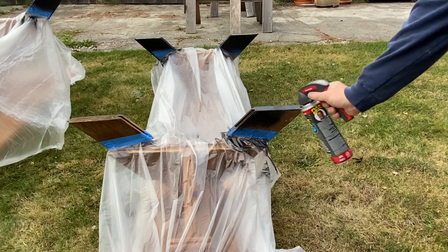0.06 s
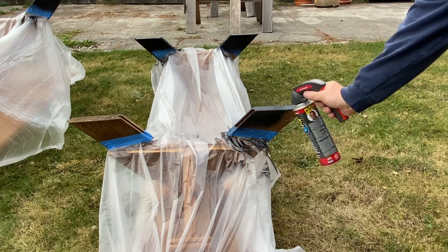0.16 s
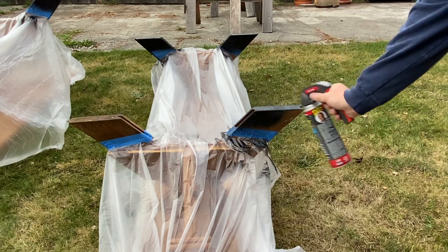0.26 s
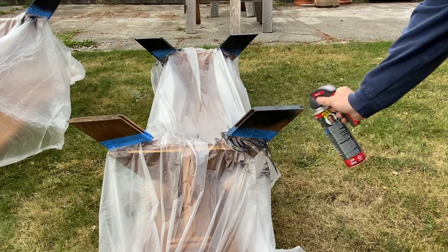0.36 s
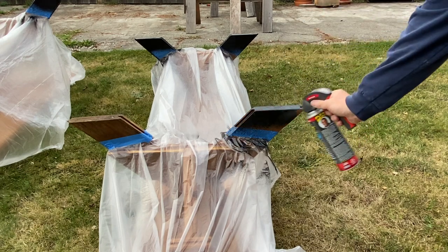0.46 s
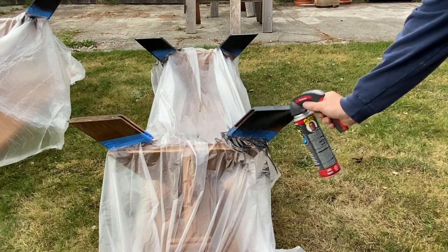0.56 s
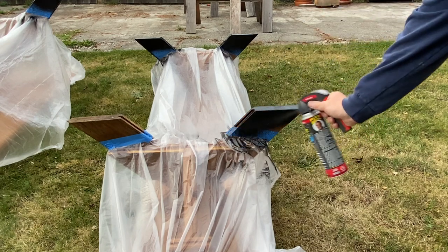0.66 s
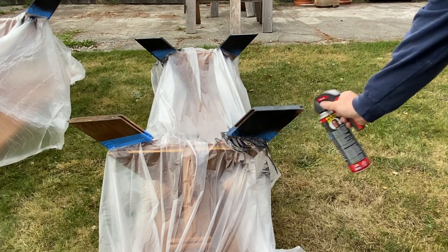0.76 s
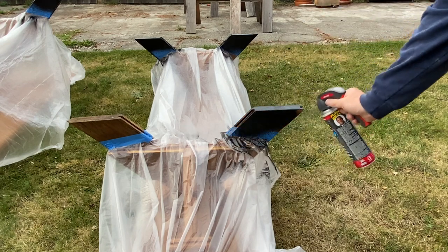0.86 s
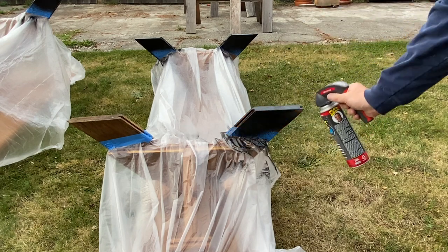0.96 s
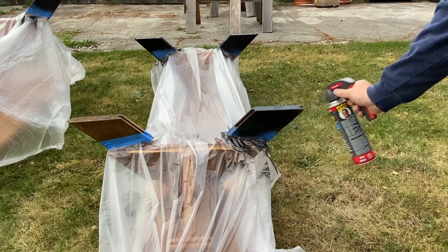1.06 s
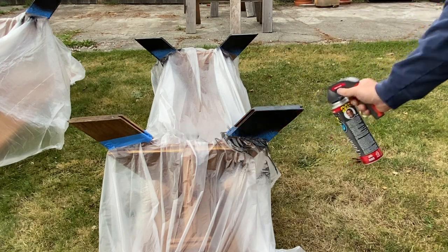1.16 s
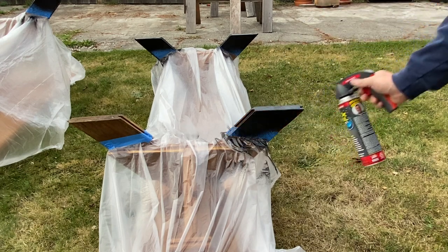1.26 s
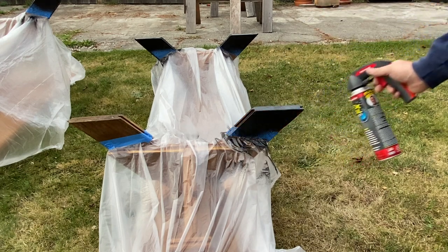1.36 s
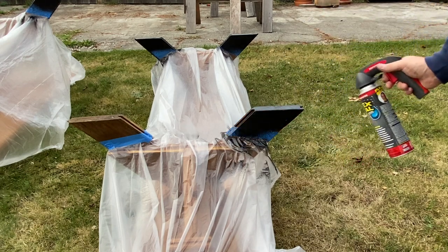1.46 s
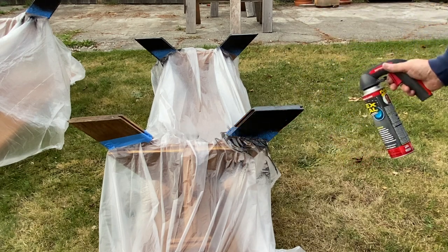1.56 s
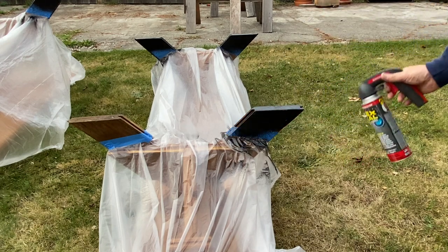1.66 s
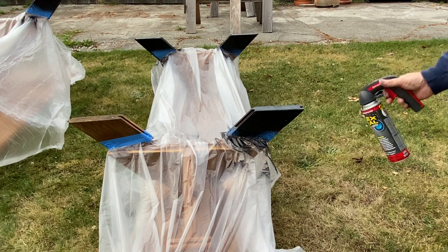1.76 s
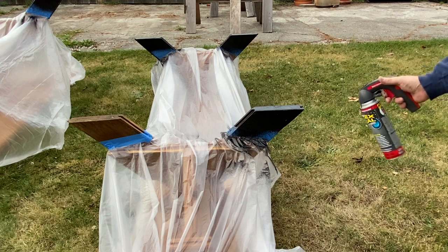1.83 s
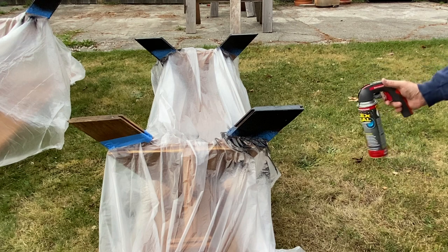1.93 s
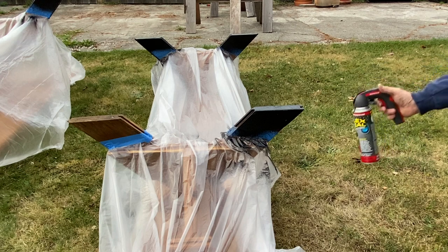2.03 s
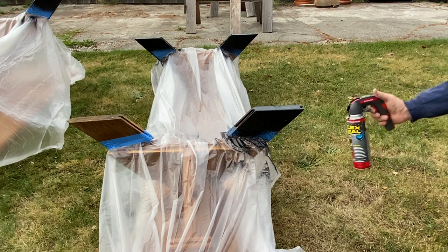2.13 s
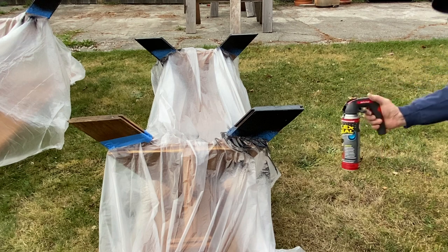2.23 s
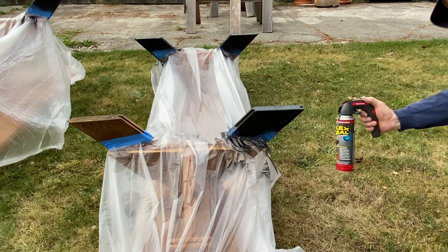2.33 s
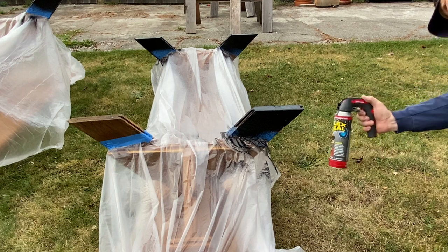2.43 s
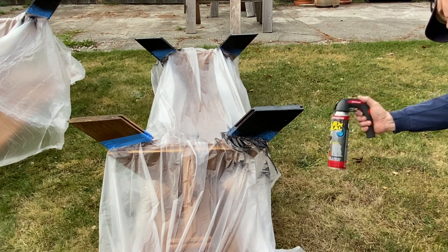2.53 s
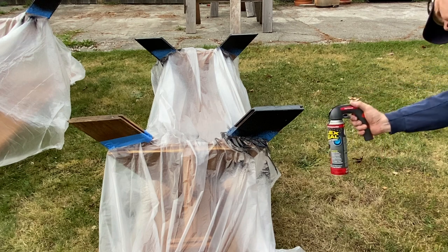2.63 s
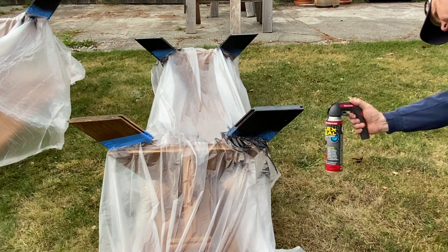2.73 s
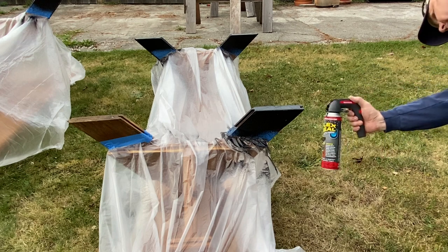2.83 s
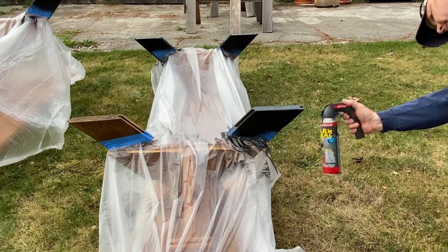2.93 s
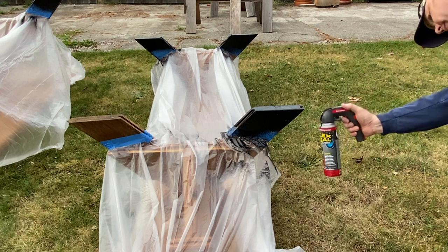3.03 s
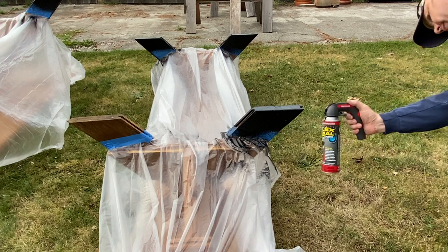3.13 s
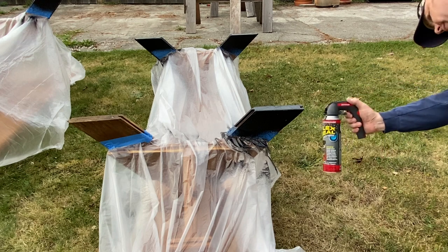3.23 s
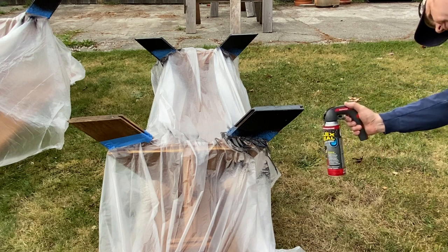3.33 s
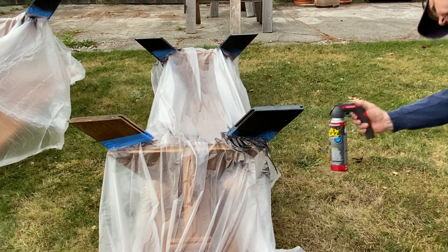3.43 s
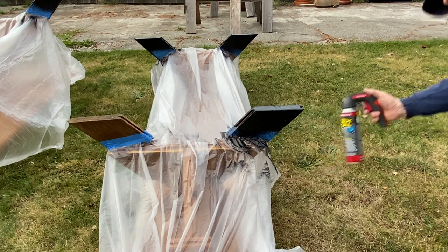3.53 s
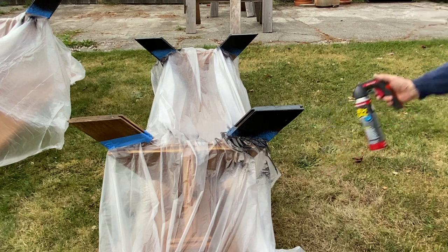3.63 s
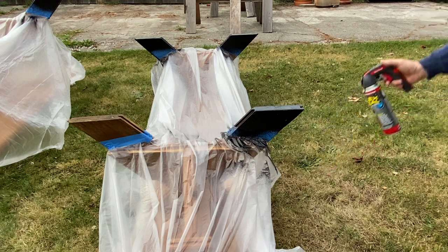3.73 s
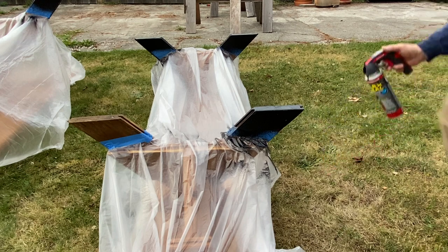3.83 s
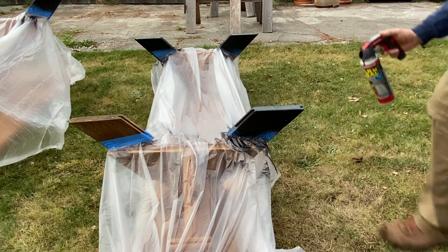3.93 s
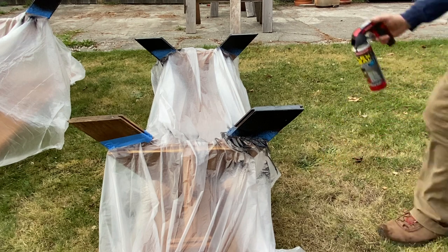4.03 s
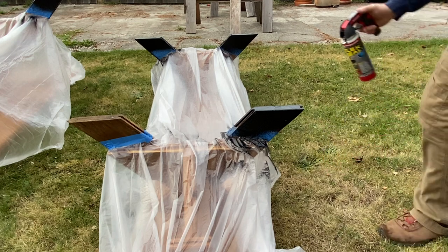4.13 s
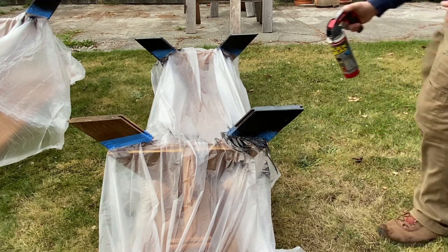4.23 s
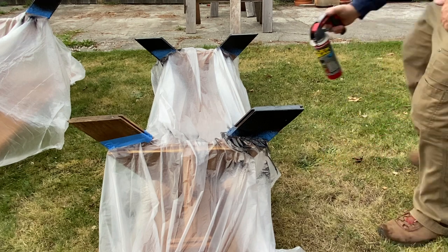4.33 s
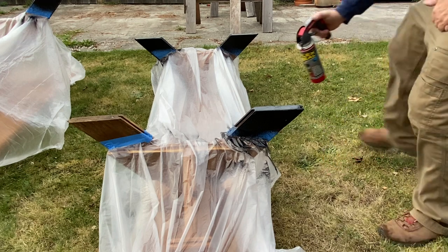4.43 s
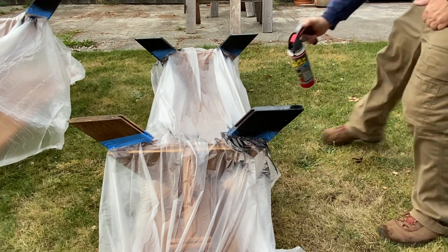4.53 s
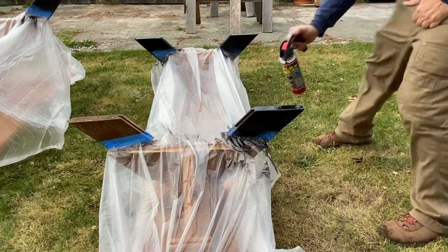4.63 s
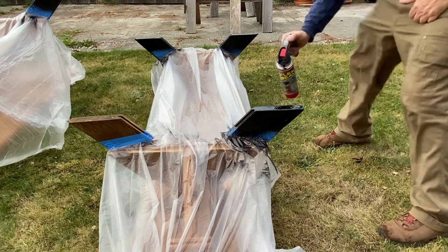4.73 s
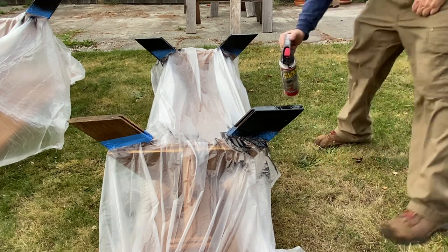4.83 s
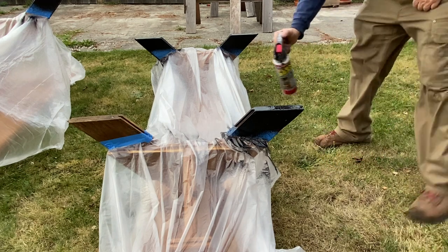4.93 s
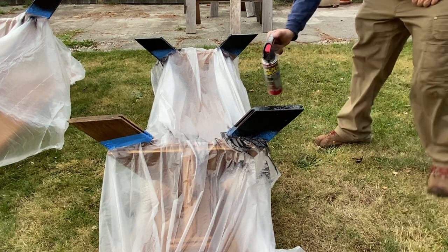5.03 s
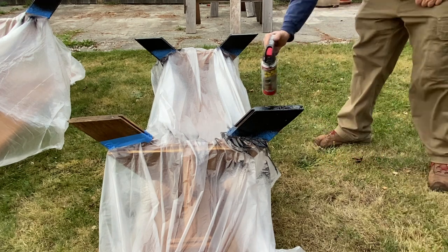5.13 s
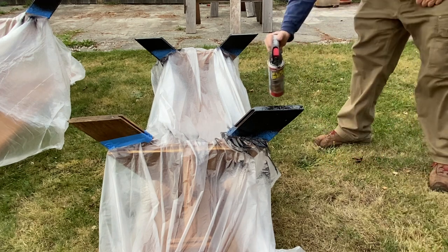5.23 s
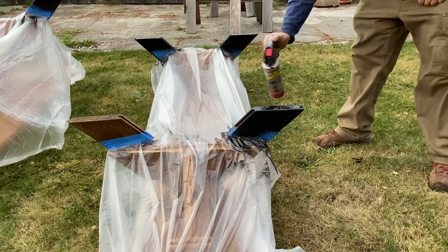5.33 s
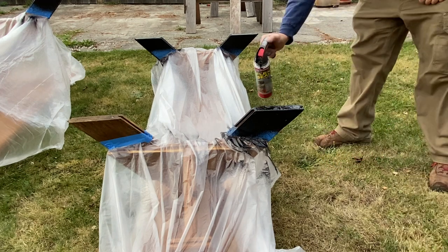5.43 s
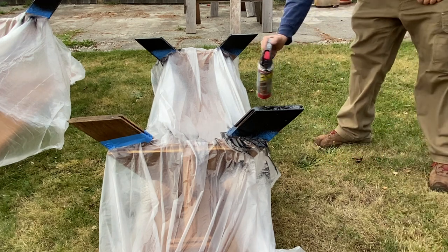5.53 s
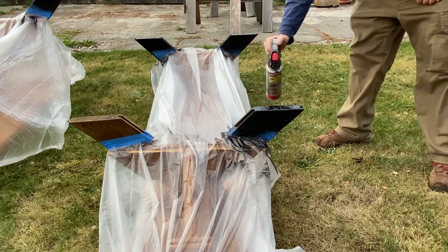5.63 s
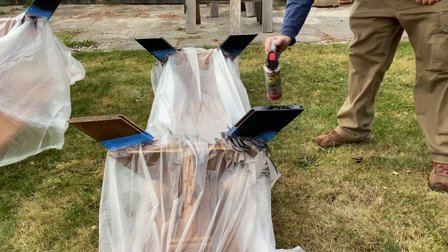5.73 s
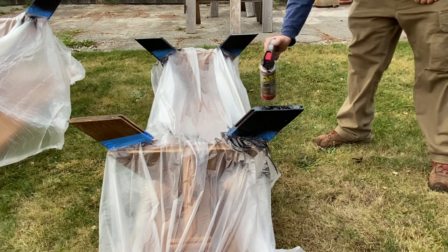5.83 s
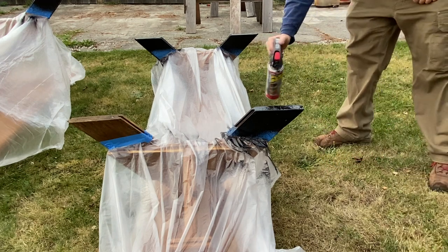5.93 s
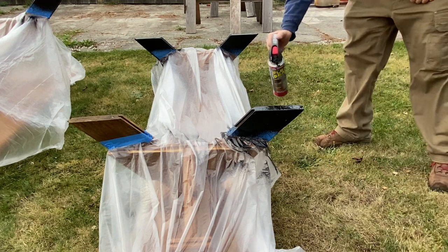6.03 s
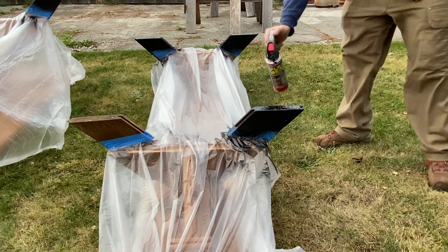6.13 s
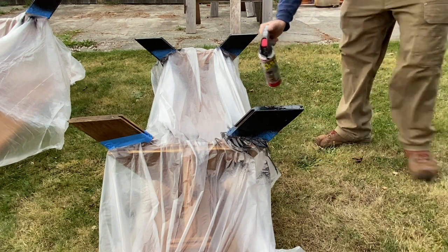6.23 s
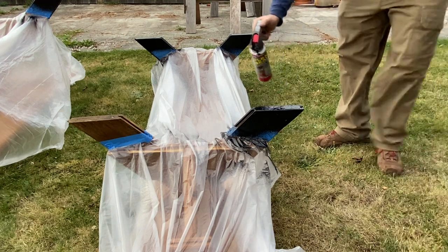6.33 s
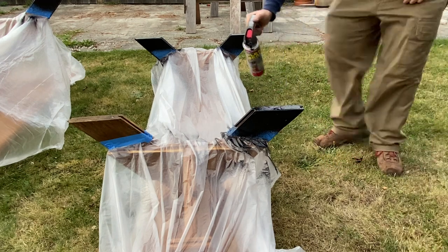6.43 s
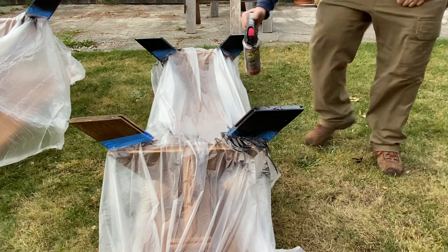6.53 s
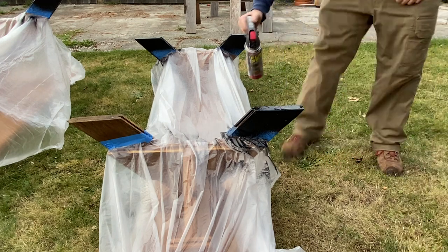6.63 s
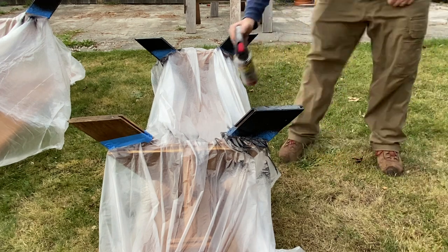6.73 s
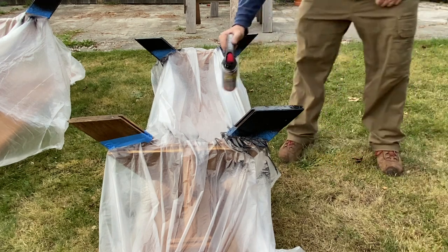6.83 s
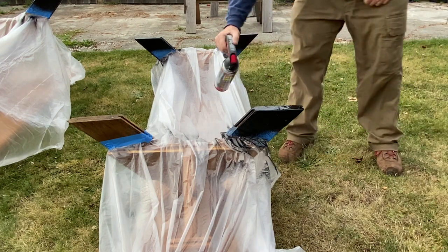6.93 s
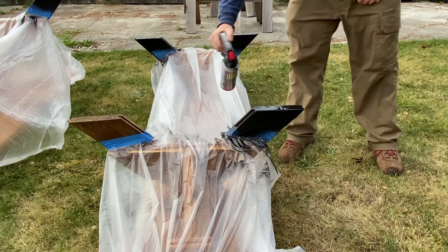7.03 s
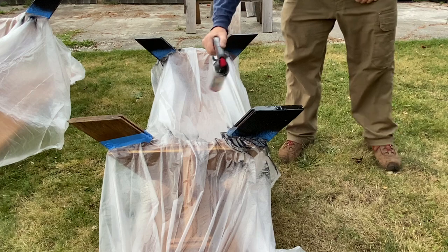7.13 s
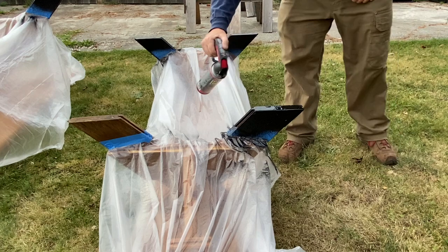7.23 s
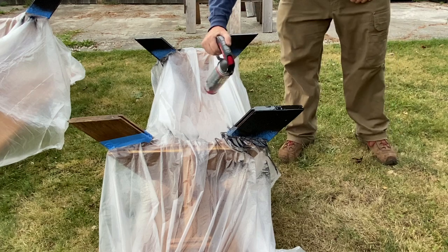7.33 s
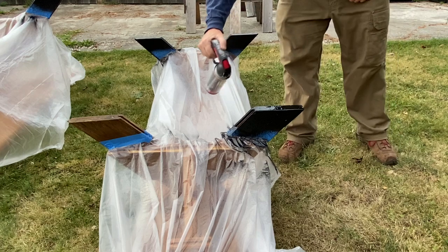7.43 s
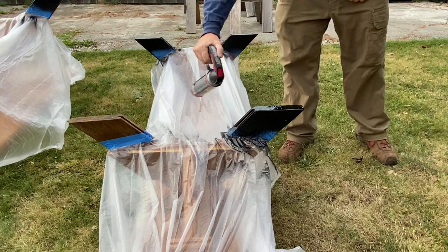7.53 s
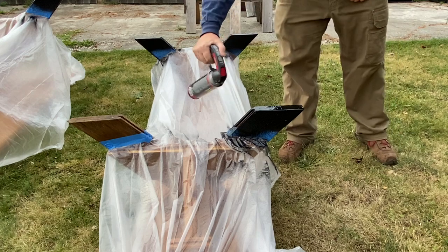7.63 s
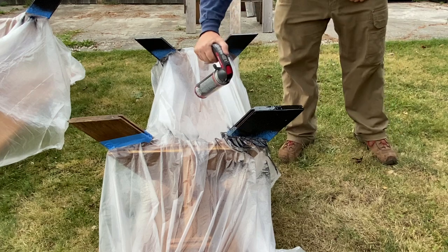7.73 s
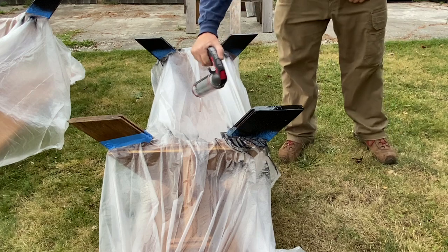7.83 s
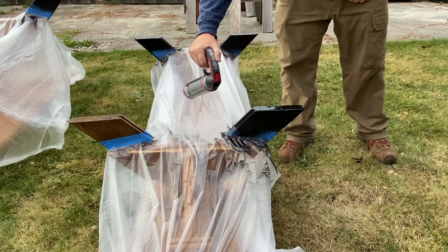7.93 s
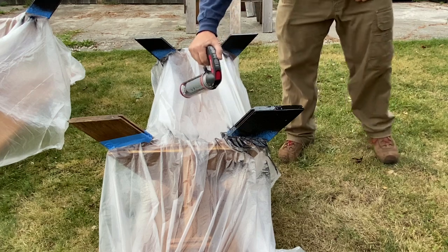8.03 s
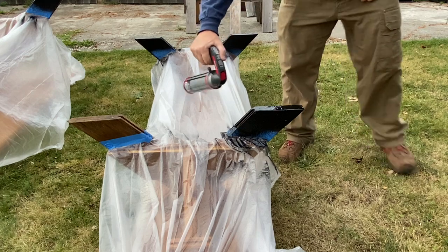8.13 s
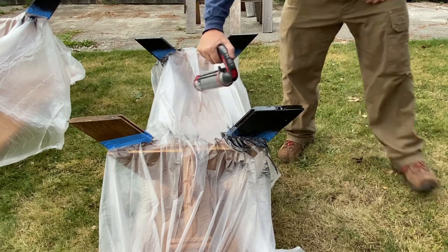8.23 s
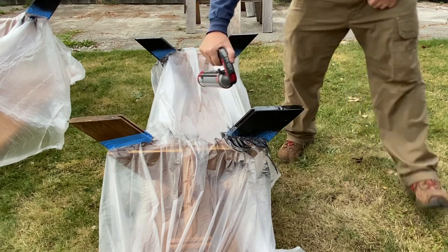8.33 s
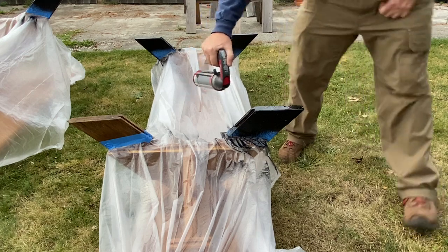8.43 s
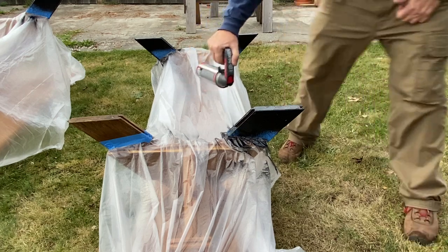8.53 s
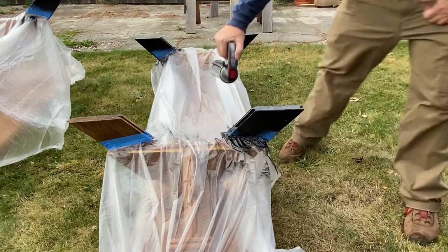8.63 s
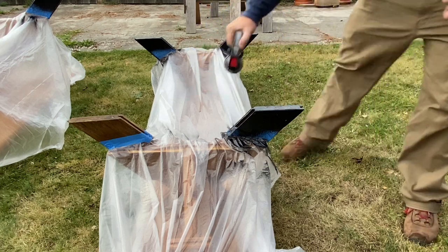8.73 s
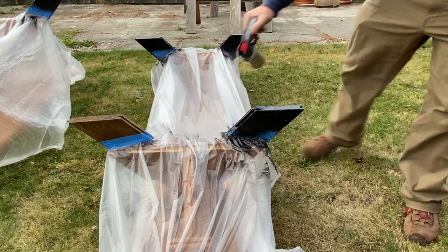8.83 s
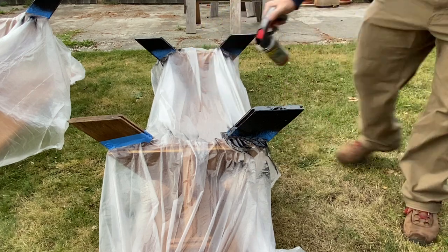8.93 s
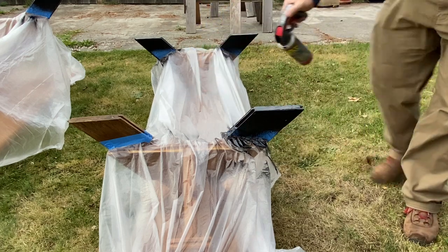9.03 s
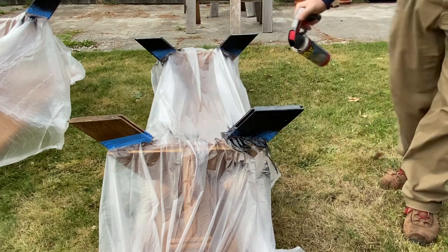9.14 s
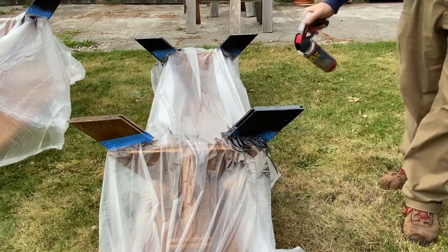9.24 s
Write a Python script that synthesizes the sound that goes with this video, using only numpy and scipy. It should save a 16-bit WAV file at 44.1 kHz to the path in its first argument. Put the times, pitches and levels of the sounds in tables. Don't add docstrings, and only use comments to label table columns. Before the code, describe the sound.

Close stereo phone pickup in an open yard: five separate jets of spray, each snapping on, building into a hollow, sputtering hiss with bright fizz on top, and shutting quickly. The first two come from the right, the later ones from in front. Pauses hold quiet cloth rustle, grass scuffs, tiny clicks and muffled steps, over faint open-air wash and far engine drone.

```python
import sys
import numpy as np
from scipy import signal
from scipy.fft import rfft, irfft, next_fast_len
from scipy.io import wavfile
from scipy.ndimage import uniform_filter1d

SR = 44100
rng = np.random.default_rng(int(sys.argv[2]) if len(sys.argv) > 2 else 0)


def boost(x):
    u = np.asarray(x, float) / 20
    return 10 ** u


def materialize(psi):
    bounded = np.clip(np.atleast_2d(psi).T, -1, 1)
    quanta = np.round(bounded * 32767).astype(np.int16)
    wavfile.write(sys.argv[1], SR, quanta)


N = 408807
HZ = np.fft.rfftfreq(1024, 1 / SR)

# valve opens in seconds, starts to shut in seconds, cap hollow in dB,
# whistle in dB re the hollow, fizz in dB re the hollow.
BURSTS = [
    (-.4, 1.197, -34, -3.5, -6),
    (2.36, 3.470, -34.5, -14, -4),
    (4.6575, 6.050, -35.5, -18, 1),
    (6.552, 7.866, -34.5, -24, .1),
    (8.233, 8.692, -34, -11, -1.5),
]
# frequency in Hz, turns the right port leads.
WIDENING = [(6600, 0), (7200, 0), (8750, .5), (9050, .5), (10800, 1), (11400, 1), (13000, 1.5),
            (13450, 1.5), (15100, 2)]


def evened(x):
    return x / np.sqrt(np.mean(x ** 2) + 1e-20)


def read(points, hz=HZ):
    f, value = np.transpose(points)
    return np.interp(np.log(hz + 1), np.log(f + 1), value)


def bumps(modes, stretch=1):
    return sum(height * np.exp(-2 * ((HZ - f * stretch) / width) ** 2) for f, width, height in modes)


def add(mix, s, sound):
    part = mix[:, max(round(s * SR), 0):][:, :sound.shape[1]]
    part += sound[:, :part.shape[1]]


def noise(length, colour_db, same, lag, patchy_db, cross_turns=0.57, cross_same=0.36, treble_same=1, wraps=0,
          scatter=((1, 1, 0, 0),), swing=((1, 1, 0),), frayed=0):
    cross_hz, wander_turns = 5580, .075
    # frequency in Hz, width in Hz, likeness lost.
    seams = [(3780, 120, .5), (10400, 300, .12), (11350, 300, .05)]
    # frequency in Hz, width in Hz, share.
    side_twist = (3560, 480, .95)
    # frequency in Hz, width in Hz, extra depth as a factor.
    frays = [(3750, 800, 1.2), (5600, 1000, .25), (14600, 2200, 1.0)]

    a, b, c, d, patches = rng.standard_normal((length // 256 + 5, 513, 5), np.float32).T
    streaks = uniform_filter1d(patches[::-1], size=4, axis=0)
    streaks = evened(uniform_filter1d(streaks, size=70, axis=1))
    patches = uniform_filter1d(patches, size=6, axis=0)
    patches = evened(uniform_filter1d(patches, size=6, axis=1)) + 1.1 * streaks

    cross = np.exp(-abs((HZ - cross_hz) / 750) ** 3.5)
    aside = bumps([side_twist]) * (HZ < 3800)
    delay_turns = HZ * lag / SR
    side_turns = (1 - cross) * (HZ > cross_hz) + aside * (.48 - delay_turns)
    turns = delay_turns * np.clip((3880 - HZ) / 200, 0, 1) + cross_turns * cross + wraps * side_turns
    turns += np.interp(HZ, *np.transpose(WIDENING))
    turns += bumps([(f, width, extra) for f, width, _, extra in scatter])
    loose = cross + .6 * aside + bumps([(13500, 900, .35), (8900, 700, .15)])
    wander = wander_turns * loose[:, None] * evened(uniform_filter1d(streaks, size=10, axis=0))

    top = treble_same + (1 - treble_same) * np.clip((HZ - 7600) / 1000, 0, 1)
    same = same + (top - same) * np.clip((HZ - 5800) / 2200, 0, 1)
    same = same + (cross_same - same) * cross
    same = same - 0.18 * (HZ > 7200) * np.sin(2 * np.pi * turns) ** 2
    lost = bumps(seams + [row[:3] for row in scatter])
    same = np.clip(same * (1 - lost), 0, 1)[:, None]

    left = a + 1j * b
    right = same * left + np.sqrt(1 - same ** 2) * (c + 1j * d)
    right = right * np.exp(2j * np.pi * (turns[:, None] + wander))
    depth_db = patchy_db * (1 + frayed * bumps(frays))[:, None]
    swing_db = np.outer(bumps(swing), np.linspace(-1, 1, a.shape[1]))
    z = np.array([left, right]) * boost(colour_db[:, None] + depth_db * patches + swing_db)
    return evened(signal.istft(z.astype(np.complex64), nperseg=1024, noverlap=768)[1][:, :length])


def flicker(length, depth_db, hz):
    wobble = signal.lfilter([1], [1, -np.exp(-2 * np.pi * hz / SR)], rng.standard_normal(length))
    wobble = evened(uniform_filter1d(evened(wobble), size=20))
    return evened(boost(depth_db * wobble))


def yard():
    # time in seconds, nearness in dB.
    traffic = [
        (0.0, -10),
        (1.13, .6),
        (2.0, .7),
        (4.8, 2.5),
        (5.3, 1.2),
        (5.94, 4.5),
        (6.53, 1.2),
        (8.83, .1),
        (9.14, -7),
    ]
    # frequency in Hz, level in dB per Hz.
    deep_colour = [(12, -63), (20, -27), (36, -5), (54, 7.5), (90, -6.5), (120, -31), (200, -120)]
    # frequency in Hz, level in dB per Hz.
    upper_colour = [(44, -27), (75, -1), (151, -5), (210, -14), (260, -18.5), (340, -59), (570, -120)]
    # frequency in Hz, level in dB per Hz.
    air_colour = [(180, -15), (260, 1.8), (600, -1.5), (1000, -2), (2000, -11.5), (3200, -20), (5000, -25),
                  (10000, -33), (15800, -36)]
    # frequency in Hz, likeness from 0 to 1.
    air_same = [(60, .97), (150, 0.97), (400, 0.13), (1000, 0.17), (3000, 0.22)]

    fast = next_fast_len(N, True)
    t, hz = np.arange(N) / SR, np.fft.rfftfreq(fast, 1 / SR)
    shared, own = rng.standard_normal(N), rng.standard_normal((2, N))
    deep = rfft(shared + .15 * own, fast) * boost(read(deep_colour, hz))
    deep = evened(irfft(deep, fast)[:, :N])
    upper = rfft(shared + 0.82 * own, fast) * boost(read(upper_colour, hz))
    upper = evened(irfft(upper, fast)[:, :N])
    wash = boost(-54.5) * noise(N, read(air_colour), read(air_same), 9.2, patchy_db=2.1)
    near_db = np.interp(t, *np.transpose(traffic))
    upper_db = -47.5 - .4 * t - .3 * near_db
    return boost(-52 + near_db) * deep + boost(upper_db) * upper + wash


def drone(start, length, from_hz, to_hz, db):
    u = np.arange(max(-start, 0), min(length, N / SR - start), 1 / SR) / length
    waver = evened(uniform_filter1d(rng.standard_normal(len(u)), size=3000))
    hz = from_hz + (to_hz - from_hz) * u + 0.83 * waver
    tone = np.sqrt(2) * np.sin(2 * np.pi * np.cumsum(hz) / SR) * flicker(len(u), 2.4, 5)
    swell = abs(np.sin(np.pi * u ** .75)) ** .9
    return start, boost(db - 1.2) * swell * tone * np.ones((2, 1))


def valve(t, opens, shuts, short_db):
    snap_s, build_s, shut_s = .012, .045, .046
    since, after = np.maximum(t - opens, 0), np.maximum(t - shuts, 0)
    building = np.exp(-since / build_s)
    leak_db = -13 * (np.maximum(opens - t, 0) / snap_s) ** .75
    flow_db = short_db * building + leak_db - 40 * (after / shut_s) ** 1.5
    return flow_db, building, after


def burst(row, ports, facing, shade, lobes, wraps, ease_db, scatter, tint, swing, contour, finger):
    # frequency in Hz, level in dB per Hz.
    hollow_colour = [(250, -26.5), (450, -28), (1000, -19), (1600, -8.8), (2800, -12.2), (3300, -18),
                     (3700, -17), (4100, -27)]
    # frequency in Hz, level in dB per Hz.
    fizz_colour = [(3300, -40), (3800, -22), (4800, -10.2), (6500, -10.2), (8000, -8), (9500, -4),
                   (12500, 0), (14500, -4), (15800, -9)]
    # frequency in Hz, width in Hz, level in dB.
    cap_modes = [(605, 85, 8), (895, 91, 2.5), (1070, 59, -1.5), (1305, 100, 4), (1500, 81, -10),
                 (1716, 140, 1), (2053, 320, 10.5), (2310, 70, -2.5), (2540, 92, 8), (2940, 92, -1.5),
                 (3064, 86, 7.5)]
    # frequency in Hz, width in Hz.
    edge_tone = (4386, 404)
    # frequency in Hz, width in Hz, level in dB.
    dips = [(6660, 200, -4), (8800, 450, -6), (10850, 400, -3), (12130, 400, -4), (11400, 500, 1.5),
            (14600, 600, 1.5), (15600, 400, -1.5)]
    # time in seconds, turn in dB.
    sweep = [(0, .5), (.22, .6), (.42, -1), (.64, 1.5), (.88, -2.5), (1.02, -1.5), (1.2, -2.2), (2.5, -1),
             (3.1, 1.2), (3.25, -.5), (3.4, .1), (4.75, 0), (5.05, 1.1), (6.05, .4), (6.62, -1.2),
             (7.0, .3), (7.85, -1.8), (8.3, .6)]

    opens, shuts, hollow_db, whistle_db, fizz_db = row
    lag, same, treble_same = ports
    stretch, low_db, upper_db, dull_db = facing
    notch_hz, notch_db, *cross = shade
    short_db, slack_db = finger
    t = np.arange(max(opens - .04, 0), shuts + .05, 1 / SR)
    n, turn_db = len(t), np.interp(t, *np.transpose(sweep))
    flow_db, building, after = valve(t, opens, shuts, short_db)

    choked = np.maximum(building, np.minimum(after / .046, 1))
    whistle_db = whistle_db + .4 * turn_db + 3 * choked
    shut_or_early = after + np.maximum(opens - t, 0)
    fizz_db = fizz_db + .15 * turn_db + 1.5 * building - .8 * (t - t[0]) - 350 * shut_or_early
    left_s = np.minimum(t - shuts, 0)
    fizz_db += ease_db * np.exp(left_s / .07)
    hollow_turn_db = turn_db + slack_db * np.exp(left_s / .03)

    sputter = flicker(n, 0.47, 54)
    body = [(600, 150, low_db), (2520, 150, upper_db), (notch_hz, 600, notch_db)]
    facing_db = bumps(body + tint + contour)
    roomy = np.clip(same - .5 * np.clip((1200 - HZ) / 400, 0, 1), 0, 1)
    hollow_colour_db = read(hollow_colour) + bumps(cap_modes, stretch) + facing_db
    hollow = boost(hollow_turn_db) * noise(n, hollow_colour_db, roomy, lag, 1.13, wraps=wraps,
                                         scatter=scatter, swing=swing, frayed=1)
    whistle_hz, whistle_width = edge_tone
    whistle_colour_db = -6 * (2 * (HZ - whistle_hz) / whistle_width) ** 2
    whistle = boost(whistle_db - 5.5) * noise(n, whistle_colour_db, same, lag, 1.0, scatter=scatter)
    fizz_colour_db = read(fizz_colour) + bumps(dips + lobes) + facing_db
    fizz_colour_db += dull_db * np.clip((10000 - HZ) / 3000, 0, 1)
    fizz = boost(fizz_db + 6.5) * noise(n, fizz_colour_db, same, lag, 1.8, *cross,
                                      min(treble_same, 1), wraps, scatter, swing, 1)
    fizz = fizz * flicker(n, 0.81, 255)
    return t[0], boost(hollow_db + flow_db) * sputter * (hollow + whistle + fizz)


def spray_can():
    ports = [
        (2.3, 0.93, .7),
        (4.5, 0.94, .97),
        (.6, .995, .9),
        (-.3, .995, .995),
        (-.4, .99, .995),
    ]
    # stretch of the cap modes, lowest mode in dB, upper modes in dB,
    # lower fizz in dB.
    facings = [
        (1.013, -0.5, 1.1, 5.5),
        (0.989, 4.5, -1.5, 1.5),
        (0.993, 4, 4, -2.1),
        (1.004, .1, 3.5, -.7),
        (1.026, 1.1, 3.5, -0.6),
    ]
    # notch in Hz, notch in dB, turns between ports near 5.6 kHz,
    # likeness there.
    shades = [
        (3500, .5, .42, .85),
        (3550, -3.5, .41, .88),
        (3800, -5.5, 0.15, 0.6),
        (3700, -2, -0.42, 0.75),
        (3704, -1.5, -0.45, .8),
    ]
    # frequency in Hz, width in Hz, level in dB.
    lobes = [
        [(5240, 380, 6.4), (7400, 350, 2.5), (9580, 1200, -3.3), (11250, 680, 5), (13280, 490, 4)],
        [(5480, 620, 7.5), (11800, 600, -6), (12300, 370, 6), (13410, 430, -5.2), (14440, 800, -7.6)],
        [(7390, 370, -6.7), (8500, 1080, 5.4), (9540, 540, -5.5), (5480, 210, 3.7), (13720, 810, -3.5)],
        [(4850, 450, -4.7), (8180, 490, 2.6), (12540, 260, 1.9), (14140, 500, -4.0), (15540, 690, -4.6)],
        [(4980, 370, -6.3), (7110, 420, -5.5), (9290, 240, 4.5), (11510, 240, -3.5), (14900, 1200, -8.3)],
    ]
    wraps = [
        1,
        1,
        0,
        0,
        0,
    ]
    eases = [
        -2.5,
        -.3,
        -.6,
        -5.5,
        -1.2,
    ]
    # frequency in Hz, width in Hz, likeness lost, extra turns.
    scatters = [
        [(2750, 500, .2, .02), (3250, 250, .3, -.05), (4850, 300, .25, 0), (5450, 400, .35, 0),
         (6600, 900, .3, -.08)],
        [(2410, 200, .3, 0), (2950, 300, .45, 0), (3300, 250, .2, 0), (4500, 600, .25, .07),
         (6350, 300, .35, -.1)],
        [(2950, 300, .12, 0), (3630, 200, .45, .05), (4000, 350, .25, 0), (4850, 350, -.25, -.08),
         (7200, 700, .35, .1)],
        [(2600, 500, .14, -.06), (3050, 250, .1, -.04), (3850, 250, .3, -.08), (4400, 450, .65, -.17),
         (5100, 300, .5, .1)],
        [(2900, 800, .13, -.05), (3850, 250, .1, -.03), (4450, 500, .28, -.1), (4950, 350, .7, .05),
         (6000, 350, .4, 0)],
    ]
    # frequency in Hz, width in Hz, level in dB.
    tints = [
        [(1000, 300, -1.5), (2300, 200, 2.5), (3950, 250, 2)],
        [(1550, 200, -3), (2820, 250, -2), (3300, 200, 2)],
        [(1320, 250, -3), (2300, 200, -3), (2900, 400, -1.5), (7600, 900, -2)],
        [(1320, 250, -3), (2850, 400, 1.5), (3800, 300, -1.5), (5600, 1500, -1)],
        [(1000, 600, -2), (2300, 200, 0), (3950, 250, 2)],
    ]
    # frequency in Hz, width in Hz, dB gained from middle to end.
    swings = [
        [(1320, 250, 2), (3500, 400, -2.5), (11500, 2000, 1)],
        [(600, 200, 1), (3400, 400, 1), (5500, 600, 2.5)],
        [(3000, 400, 1.5), (6500, 1000, 1.5), (9600, 800, 1.5)],
        [(3700, 400, 2), (5400, 1200, -1), (7400, 1000, 2)],
        [(2100, 400, .5), (5500, 700, 1), (11500, 2000, -1)],
    ]
    # frequency in Hz, width in Hz, level in dB.
    contours = [
        [(3550, 450, -3), (5250, 600, 4.5), (8200, 900, 3)],
        [(3500, 400, -2.5), (5000, 900, 1.5), (8200, 1500, 1.5)],
        [(3700, 600, -7), (4650, 500, 2), (5500, 500, -1.5), (6300, 300, 2.5)],
        [(3600, 400, -6.5), (4400, 900, 3), (6000, 450, -1.5), (7500, 1500, 1), (11700, 800, 2)],
        [(3620, 220, -4), (4550, 350, 3), (6500, 300, 1), (10900, 1200, 2)],
    ]
    # flow short at the snap in dB, hollow lost as it slackens in dB.
    fingers = [
        (-7.5, -.5),
        (-7.5, -.5),
        (-5, -4),
        (-7.5, -1),
        (-4, -4.5),
    ]
    can = np.zeros((2, N))
    for parts in zip(BURSTS, ports, facings, shades, lobes, wraps, eases, scatters, tints, swings, contours, fingers):
        add(can, *burst(*parts))
    return can


def echoes(x, t60, wet_db, dull):
    t = np.arange(SR // 3) / SR
    tail = rng.standard_normal(len(t)) * boost(-60 * t / t60) * (t > .008)
    tail = signal.lfilter([1], [1, -np.clip(dull, 0, .9)], tail)
    tail = tail / np.linalg.norm(tail)
    return boost(wet_db) * signal.fftconvolve(x, tail[None], axes=1)[:, :N]


def knock(db, hz, width, t60, lag):
    t = np.arange(round(t60 * SR)) / SR
    r = np.exp(-np.pi * width / SR)
    push = rng.standard_normal(len(t)) * boost(-60 * t / t60) + 3.5 * (t == 0)
    for _ in range(2):
        push = signal.lfilter([1, 0, -1], [1, -2 * r * np.cos(2 * np.pi * hz / SR), r * r], push)
    puff = np.pad(boost(db) * push / abs(push).max(), (24, 40))
    f = np.fft.rfftfreq(len(puff), 1 / SR)
    turns = f * lag / SR * np.clip((5500 - f) / 2000, 0, 1)
    turns += np.interp(f, *np.transpose(WIDENING))
    return np.array([puff, irfft(rfft(puff) * np.exp(2j * np.pi * turns), len(puff))])


def far(start, length, hz, width, db):
    n = round(length * SR)
    band = noise(n, -6 * np.minimum((2 * (HZ - hz) / width) ** 2, 15), .75, 3.0, 2.0)
    return start, boost(db) * band * 1.6 * np.hanning(n) ** .8 * flicker(n, 2.0, 20)


def rustle(start, end, lag, same):
    # peak in seconds, swish in dB, seconds to rise 20 dB,
    # dull scuff in dB re the swish.
    strokes = [(1.25, -63, .1, -3), (1.44, -60, .2, -8), (1.53, -66, .2, 1.5), (1.75, -60, .2, 3),
               (1.825, -57.5, .3, 2.5), (2.109, -57.5, .6, -3), (2.249, -56.5, .25, -3),
               (3.51, -60, .1, -7), (3.64, -63, .12, -6), (3.82, -57, .3, 10.5), (3.915, -53, .1, 0),
               (3.96, -54, .3, -.6), (4.022, -44.5, .15, 1.2), (4.12, -57, .3, 3), (4.21, -64, .2, -1.5),
               (4.3, -58, .2, 4), (4.49, -78, .1, 20.5), (4.6, -67, .15, 6), (6.11, -68, .1, 4),
               (6.254, -63, .12, 3), (6.395, -50, .05, -12), (6.48, -63, .3, 2.5), (7.95, -65, .2, 8),
               (8.195, -68, .12, 11), (8.78, -63, .3, 12), (8.88, -48.5, .11, 4), (8.93, -58, .1, 4),
               (8.975, -59, .15, 4), (9.03, -57, .03, 3), (9.055, -56, .12, 7), (9.097, -51, .06, -6),
               (9.155, -51, .12, -3), (9.23, -59, .2, 6)]
    # frequency in Hz, level in dB per Hz.
    swish_colour = [(4500, -25), (5800, -3.5), (9000, -4.5), (12000, -4.5), (15800, -8)]
    # frequency in Hz, level in dB per Hz.
    brush_colour = [(1000, -20), (1800, 2.5), (2700, -9.5), (3400, -5), (4500, -2.5), (5500, -2),
                    (6500, -23)]
    # frequency in Hz, level in dB per Hz.
    scuff_colour = [(180, -2), (300, 0.5), (800, -3.5), (1500, -9), (2500, -32.5)]

    t = np.arange(start, end, 1 / SR)
    n = len(t)
    s, db, rise, dull_db = np.array([r for r in strokes if start < r[0] < end]).T[:, :, None]
    lift = np.minimum(.6 * rise, .1)
    fall_db = np.where(t < s, 20 * (s - t) / rise, 20 * (t - s) / lift)
    power = boost(db - fall_db) ** 2
    drag_db = .15 * dull_db + 9 * np.log10(rise / .3)
    bright, middle, dull = (np.sqrt((power * boost(2 * extra_db)).sum(0)) for extra_db in (0, drag_db, dull_db))
    swish = bright * noise(n, read(swish_colour), same, lag, 1.2)
    brush = boost(-3) * middle * noise(n, read(brush_colour), same, lag, 0.94)
    scuff_level = boost(-2.5) * dull + boost(-68)
    scuff = scuff_level * noise(n, read(scuff_colour), 0.15, 7.5, 2.5)
    movement = (swish + brush) * flicker(n, 2.8, 120) + scuff * flicker(n, 1.5, 40)
    return start, movement * signal.windows.tukey(n, .05)


def scene():
    # start in seconds, length in seconds, from Hz, to Hz, peak in dB.
    engines = [(-.3, 1.2, 55, 53, -54), (.6, 1.6, 58, 65, -46.5), (2.2, 1.5, 62, 58, -49.5),
               (3.2, 2.1, 59, 47, -46.5), (5.6, .75, 63, 71, -36), (6.15, .5, 72, 76, -48),
               (1.8, .95, 133, 137, -50), (6.6, 1.2, 75, 64, -43.5), (7.4, 2.4, 61.5, 58, -45.5),
               (5.6, 2.0, 44, 48.5, -47), (-.5, 2.8, 118.2, 117, -47.5), (2.0, 2.0, 117, 113, -48),
               (3.7, 1.4, 113, 108, -52), (0, 1.6, 93.8, 94.1, -47), (1.8, 1.6, 94, 94.1, -52),
               (4.2, 1.7, 93.2, 93.4, -56), (6.7, 1.5, 94, 94.3, -48), (8.3, 1.8, 94.2, 93.4, -53),
               (1.3, .65, 141, 153, -51), (2.6, 2.1, 146, 153, -51), (4.4, 1.7, 150, 143, -53.5),
               (5.7, 1.2, 146, 151.5, -50), (7.7, 2.6, 147, 148, -54), (-4, 17, 188.5, 188, -59.5)]
    pauses = [
        (6.0, .3),
        (7.8, .65),
        (7.0, .5),
        (7.0, .5),
        (6.6, .6),
    ]
    # time in seconds, peak in dB, centre in Hz, width in Hz.
    ticks = [(1.5812, -36, 7000, 9040), (1.582, -44, 2500, 1500), (1.714, -50, 2510, 1200),
             (1.74, -43, 6010, 3500), (3.9124, -44, 6880, 4000), (3.9518, -45, 2130, 1500),
             (3.9992, -41, 6310, 4000), (4.043, -48, 3000, 3000), (4.1538, -50, 2120, 1500),
             (4.059, -37, 1800, 1200), (4.0585, -36, 5000, 5000), (4.1716, -29.5, 10000, 12000),
             (4.24, -50, 2500, 1800), (4.4227, -54, 1670, 1200), (4.4681, -52, 1650, 1200),
             (4.5277, -34, 5500, 10000), (6.393, -42, 9940, 6000), (8.768, -44, 1430, 900),
             (9.078, -40, 10200, 3000), (9.092, -41, 9000, 4000), (9.0317, -47, 6980, 3000),
             (9.0626, -44, 10200, 3000), (9.0696, -41, 10500, 3000), (9.0875, -30, 10000, 6000),
             (9.0995, -38, 7290, 3000), (9.101, -28, 8500, 9000), (9.1018, -30, 9500, 9000),
             (9.151, -42, 10470, 4010), (9.2078, -46, 6910, 3000)]
    # time in seconds, peak in dB, centre in Hz, width in Hz, t60 in seconds.
    thuds = [(0, -36.5, 298, 299.6, 0.1), (1.759, -46, 480, 500, .03), (1.816, -38, 460, 900, .025),
             (1.998, -45, 470, 500, .03), (2.082, -44, 380, 400, .03), (3.708, -39, 300, 300, .05),
             (3.7195, -37, 820, 220, .03), (4.3265, -36.5, 600, 1200, 0.02), (4.96, -39, 260, 500, .2),
             (5.0, -37, 280, 500, .2), (5.04, -37, 300, 600, .2), (5.08, -39, 500, 600, .15),
             (9.0105, -43, 9000, 11000, .04), (9.204, -46, 6900, 1500, .08), (4.0, -44, 5000, 4000, .05),
             (3.905, -46, 5500, 4000, .06)]
    # start in seconds, length
    # in seconds, centre in Hz, width in Hz, level in dB.
    soft_bands = [(.98, .4, 2200, 800, -65), (.98, .48, 5000, 3000, -65), (4.3, .4, 1700, 700, -65),
                  (6.1, .5, 1850, 800, -65), (2.1, .26, 3000, 1500, -67), (4.22, .16, 12500, 6000, -62),
                  (9.0, .2, 7200, 1600, -62), (9.055, .06, 10300, 2200, -58), (8.82, .5, 1275, 60, -59),
                  (8.7, .7, 1400, 500, -62), (8.72, .25, 2300, 600, -66)]

    mix, can = yard(), spray_can()
    for row in engines:
        add(mix, *drone(*row))
    for s, db, hz, width, t60 in thuds:
        add(mix, s, knock(db, hz, width, t60, lag=5.2))
    for row in soft_bands:
        add(mix, *far(*row))
    for last, coming, place in zip(BURSTS, BURSTS[1:] + [(N / SR,)], pauses):
        add(mix, *rustle(last[1], coming[0], *place))
    for s, db, hz, width in ticks:
        add(mix, s - 24 / SR, knock(db, hz, width, t60=0.0045, lag=7.0))
    return mix + can + echoes(can, t60=0.3, wet_db=-23, dull=.3)


def thinned(x, under_db):
    hz, _, z = signal.stft(x.astype(np.float32), SR, nperseg=2048, noverlap=1536)
    near = uniform_filter1d(abs(z) ** 2, size=3, axis=1)
    near = uniform_filter1d(near, size=4, axis=2)
    wide = uniform_filter1d(near, size=45, axis=1)
    limit_db = under_db + 2.2 * np.exp(-((hz - 3720) / 380) ** 2)
    weak = (near < wide * boost(2 * limit_db)[:, None]).all(0) & (hz > 2600)[:, None]
    return signal.istft(z * ~weak, nperseg=2048, noverlap=1536)[1][:, :N]


def band_limit(x):
    return signal.sosfilt(signal.butter(12, 16820, fs=SR, output="sos"), x)


def record(dry):
    edge = signal.firwin(2001, 15735, window=("kaiser", 9), fs=SR)
    limited = signal.oaconvolve(thinned(dry, under_db=-6.0), edge[None], "same")
    return band_limit(limited)


dry = scene()
out = record(dry)
materialize(out)
```